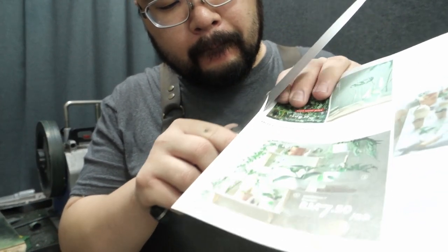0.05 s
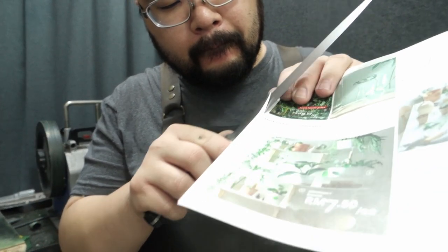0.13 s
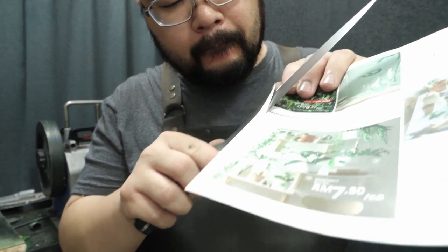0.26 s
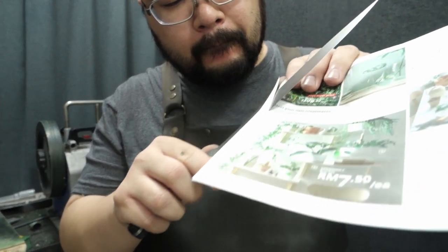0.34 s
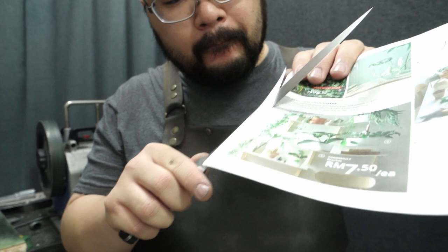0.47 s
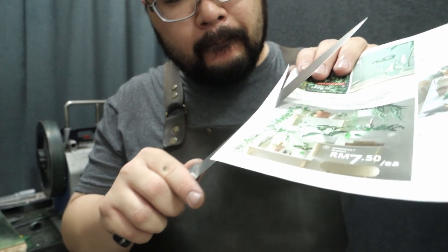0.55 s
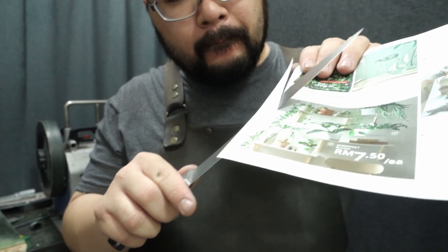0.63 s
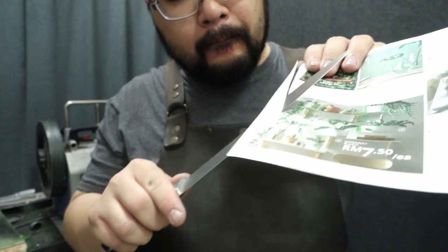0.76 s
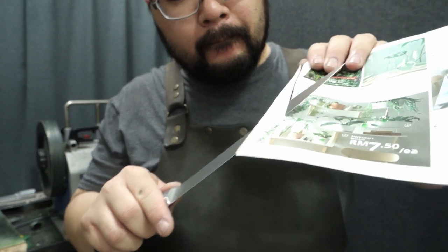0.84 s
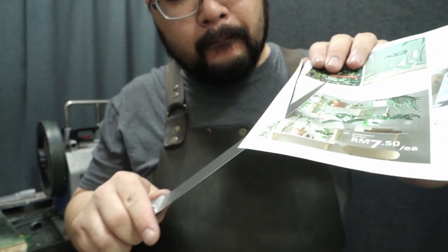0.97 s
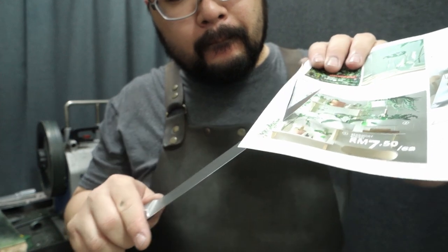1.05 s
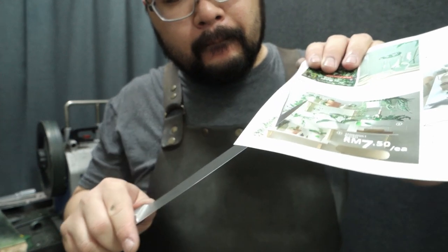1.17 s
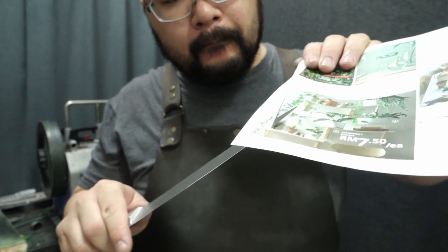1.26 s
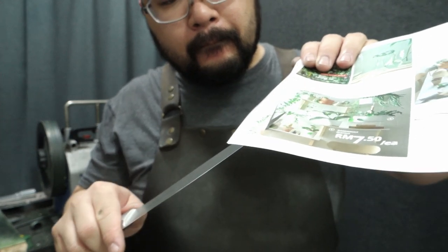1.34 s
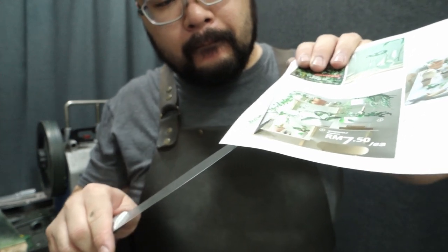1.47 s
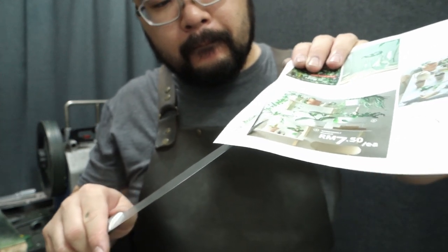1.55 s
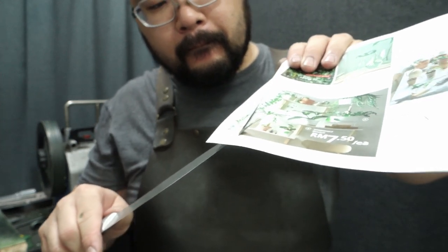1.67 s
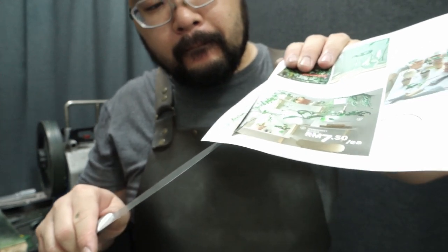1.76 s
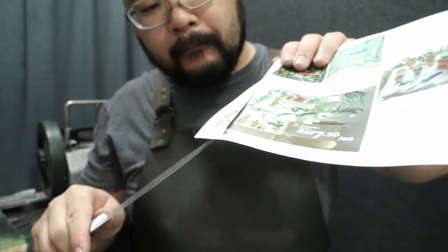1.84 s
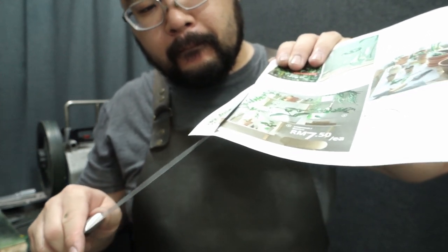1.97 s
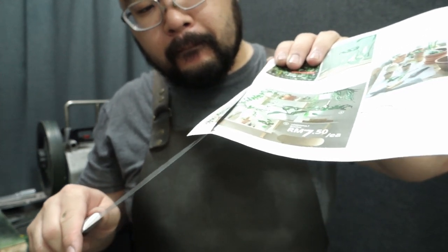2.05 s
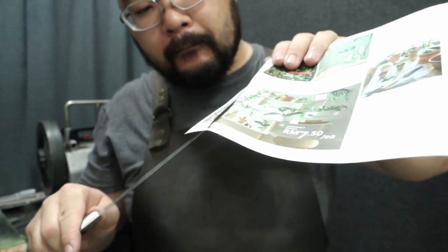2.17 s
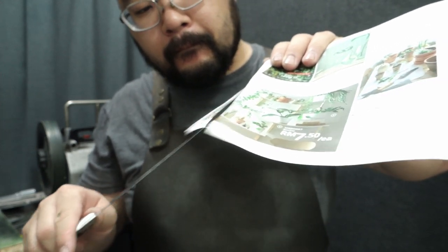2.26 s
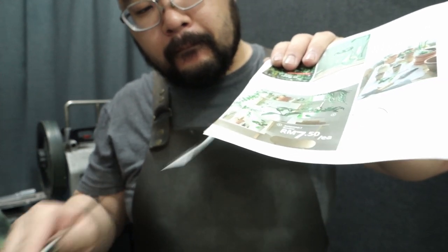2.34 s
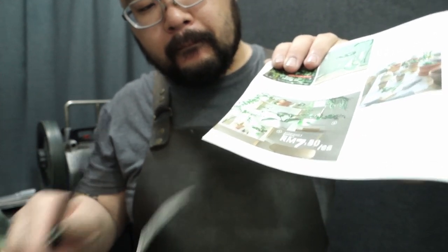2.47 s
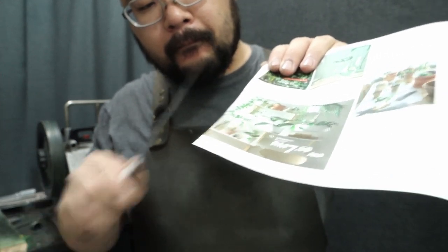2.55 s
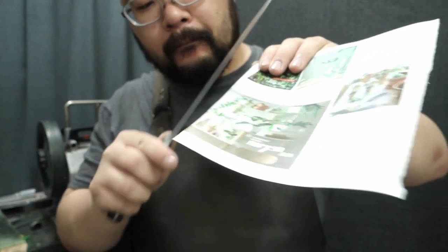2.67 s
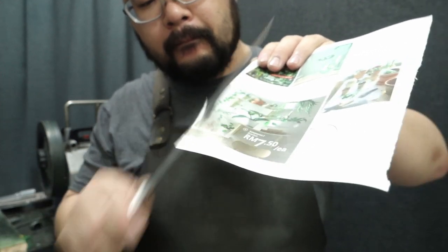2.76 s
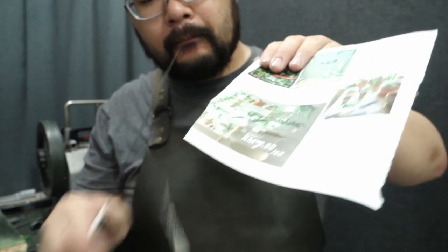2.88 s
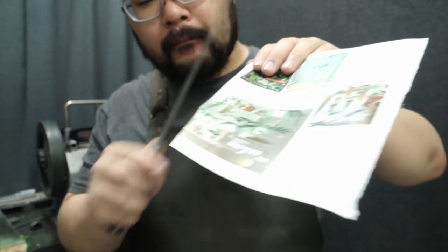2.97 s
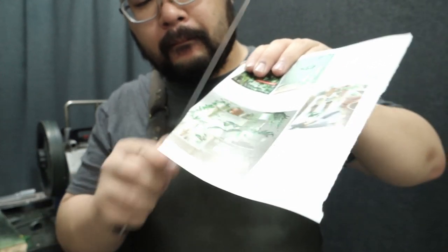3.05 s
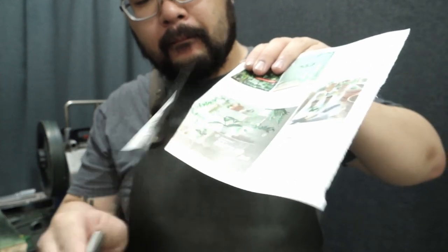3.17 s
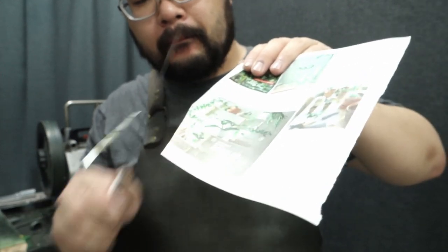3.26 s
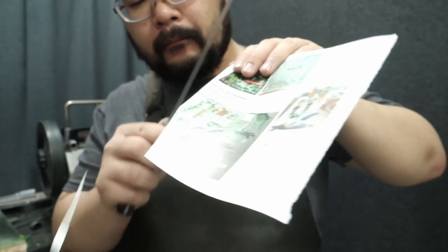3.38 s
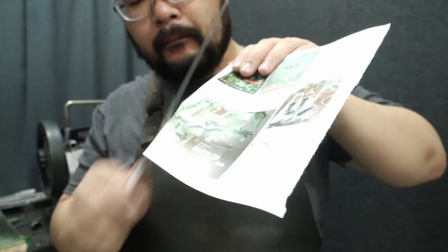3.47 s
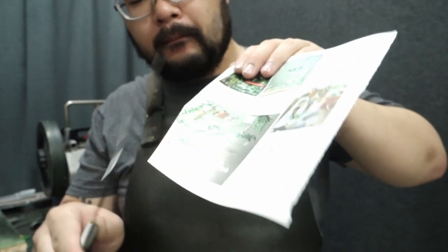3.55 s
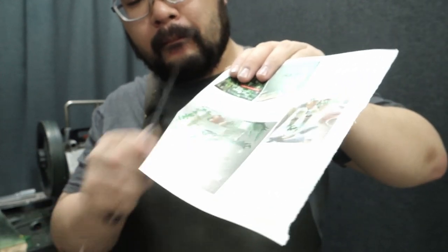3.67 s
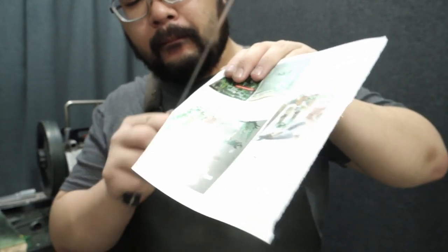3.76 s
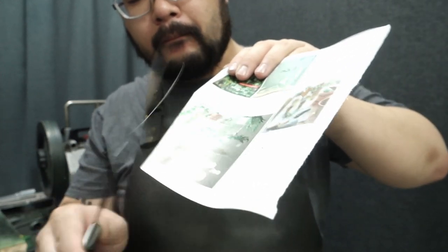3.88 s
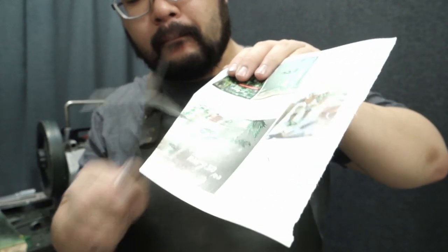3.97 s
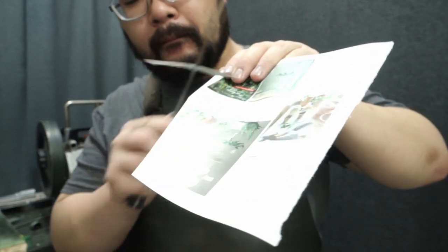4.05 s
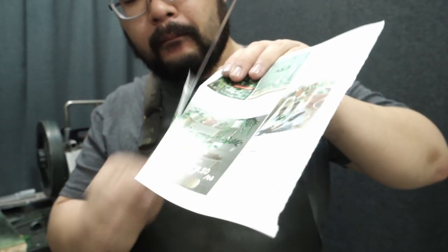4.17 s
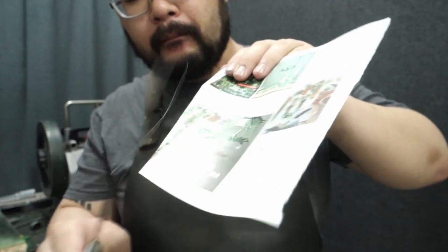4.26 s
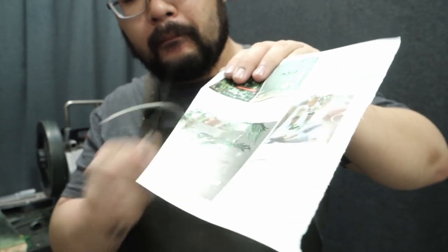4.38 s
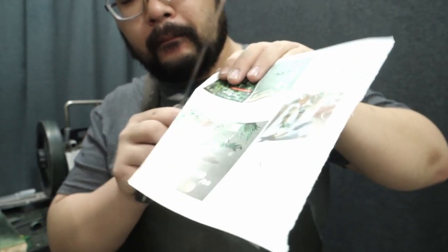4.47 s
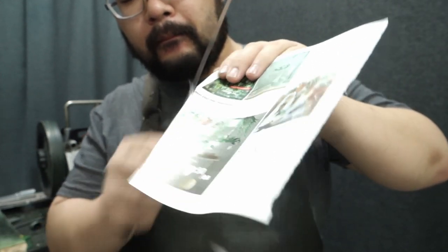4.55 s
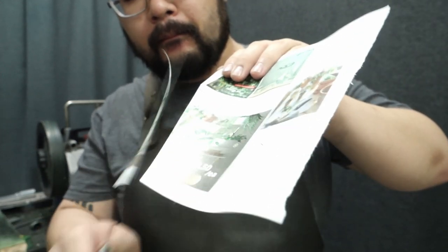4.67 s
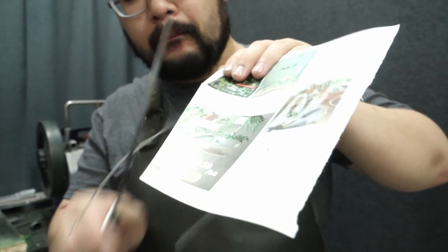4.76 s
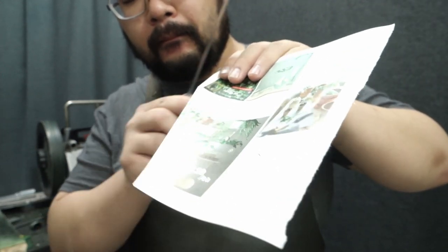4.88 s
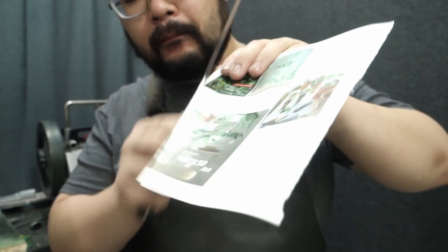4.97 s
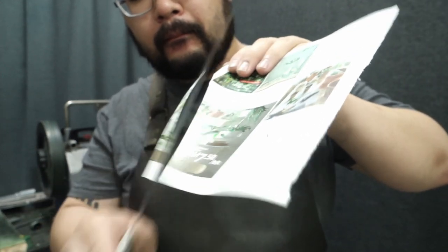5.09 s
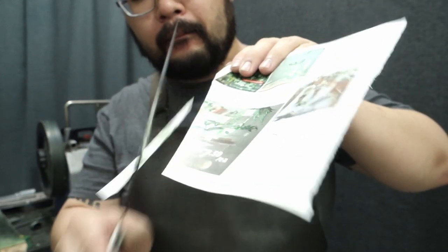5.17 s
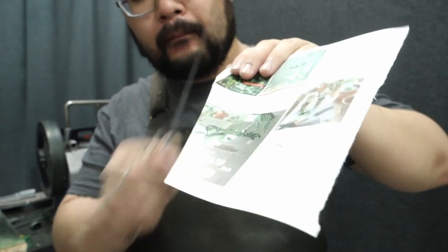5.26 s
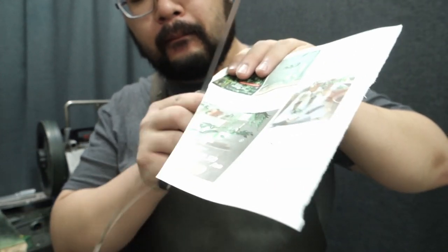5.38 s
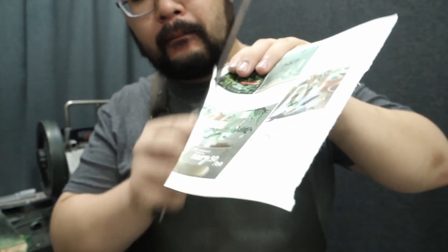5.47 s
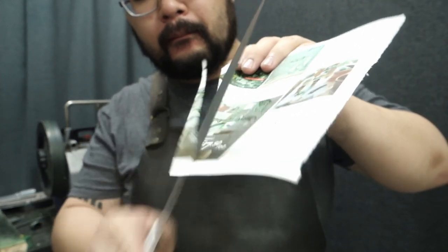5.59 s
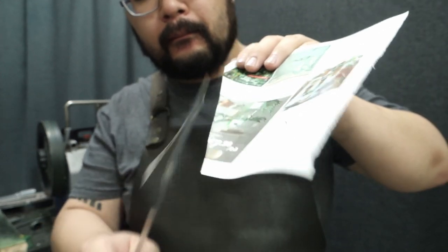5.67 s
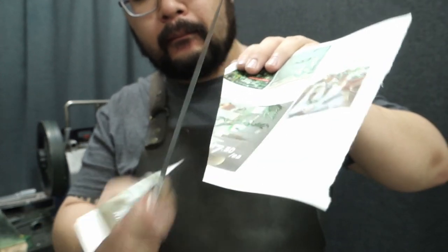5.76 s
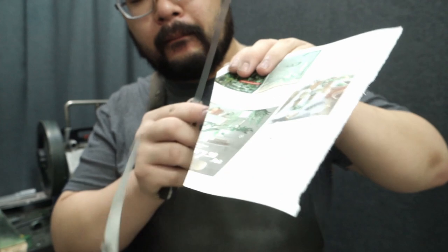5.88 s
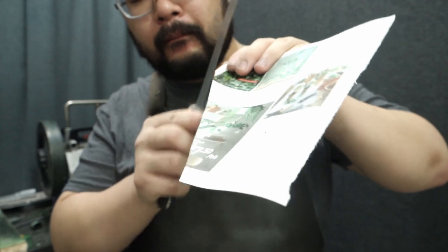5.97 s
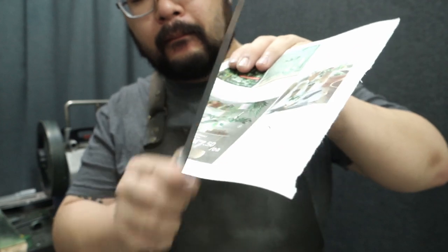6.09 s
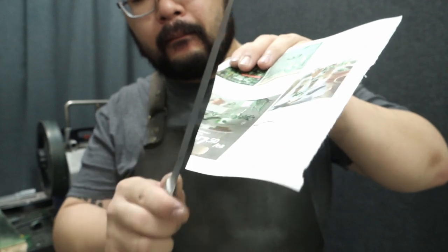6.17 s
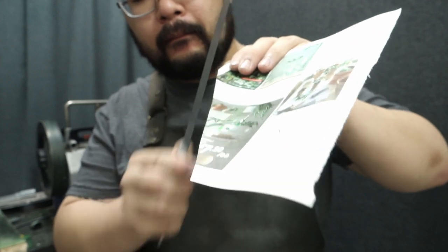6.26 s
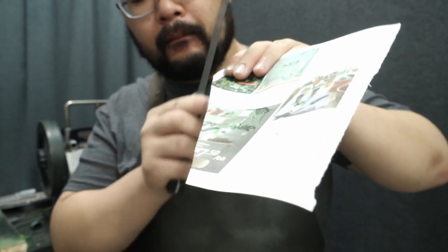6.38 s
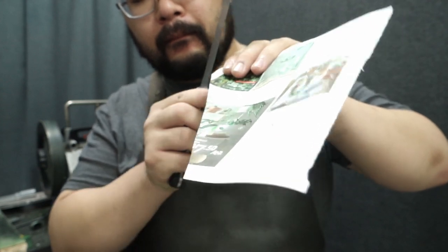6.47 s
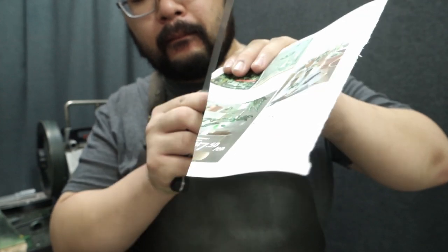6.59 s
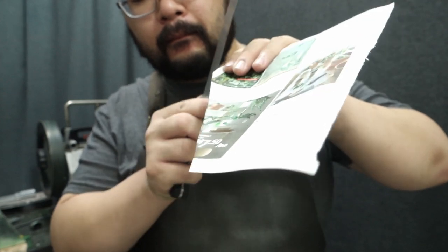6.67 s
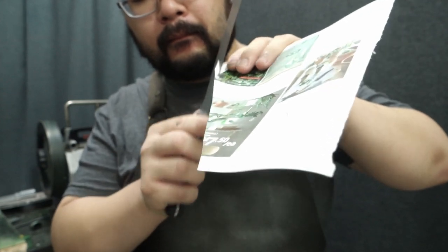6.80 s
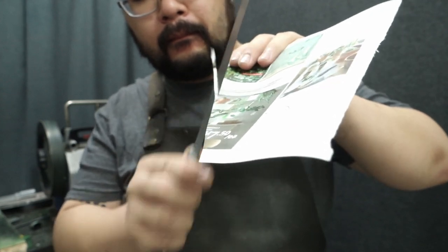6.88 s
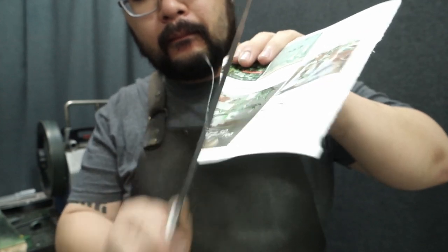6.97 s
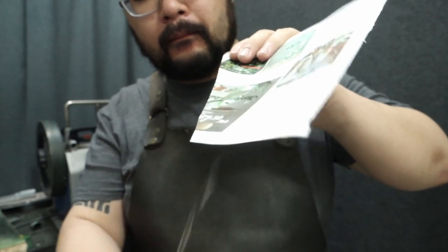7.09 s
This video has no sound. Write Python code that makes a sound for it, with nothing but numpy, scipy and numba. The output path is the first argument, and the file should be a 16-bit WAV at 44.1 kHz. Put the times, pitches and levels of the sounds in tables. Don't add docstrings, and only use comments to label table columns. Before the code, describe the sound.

A kitchen knife works through a sheet of glossy paper, very close in stereo. First a slow, wavering, gritty tear lying to the right fades to a creep, with small crease ticks. Then eight separate quick slices, growing longer and brighter, with light rustles between them, and finally one slow draw that swells and thins into sizzle. A small curtained workshop answers briefly over a low fan drone.

```python
import sys
import numpy as np
from scipy import signal
from scipy.fft import rfft, irfft
from scipy.io import wavfile
from scipy.ndimage import uniform_filter1d, map_coordinates
from numba import njit

SR = 44100
rng = np.random.default_rng(int(sys.argv[2]) if len(sys.argv) > 2 else 0)


def master(y):
    cut = np.clip(np.atleast_2d(y).T, -1, 1)
    pcm = np.round(cut * 32767)
    wavfile.write(sys.argv[1], SR, pcm.astype(np.int16))


def attenuation_scalar(level_db):
    decades = np.asarray(level_db, float) / 20
    return 10 ** decades


N = 314433


@njit
def svf(x, hz, width, low):
    y, b, l = np.empty(len(x)), 0., 0.
    for i in range(len(x)):
        g, k = np.tan(np.pi * hz[i] / SR), width[i] / hz[i]
        v = (b + g * (x[i] - l)) / (1 + g * (g + k))
        y[i] = (1 - low) * k * v + low * (l + g * v)
        b, l = 2 * v - b, l + 2 * g * v
    return y


def band(x, hz, width):
    width = width + np.zeros(len(x))
    once = svf(x, hz, width, 0.)
    return svf(once, hz, width, 0.) / np.sqrt(width / 28000)


def highpass(x, hz):
    return signal.sosfilt(signal.butter(2, hz, "high", fs=SR, output="sos"), x)


def walk(rate):
    hold = int(SR / rate)
    steps = np.repeat(rng.standard_normal(N // hold + 1), hold)
    return 1.97 * uniform_filter1d(uniform_filter1d(steps, hold), hold)[:N]


def bumps(table):
    t = np.arange(N) / SR
    return sum(db * np.exp(-((t - s) / half) ** 2) for s, db, half in table)


def contact(t, start, end):
    graze_db, graze_s, land_s = -20, 0.003, 0.0005
    bite_db, bite_s, leave_s = 2.5, 0.0031, 0.004
    graze = attenuation_scalar(graze_db) * np.clip(1 + (t - start) / graze_s, 0, 1)
    bite = attenuation_scalar(bite_db * np.exp(-np.abs(t - start) / bite_s))
    land = np.clip((t - start) / land_s, 0, 1) * bite
    return np.maximum(graze, land) * np.clip(1 - (t - end) / leave_s, 0, 1)


# start_s, length_s, force_db, sharpness_db, droop_db (loss of body at the far edge)
QUICK_CUTS = [
    (2.75, 0.049, -29.5, 3, 0.5),
    (3.1092, 0.062, -24.5, -1, 4),
    (3.4607, 0.066, -22.5, -4, 0.5),
    (3.814, 0.096, -22, -6.5, 6.5),
    (4.1654, 0.1, -22.5, -4.5, 8.5),
    (4.5551, 0.12, -22.5, -4, 5),
    (4.9938, 0.14, -24.5, 0, 7.5),
    (5.4485, 0.18, -24, 0.5, 10),
]


def quick_cuts():
    gather_db, gather_s, droop_power, kept_share = 2, 0.015, 3.9, 1.27
    taut_db, slack_db_per_s = -39, 102.5
    shake_db, shake_s = 16, 0.0089
    along = np.linspace(0, 1, num=24)
    cuts = []
    for start, length, force_db, sharp_db, droop_db in QUICK_CUTS:
        t = along * length
        lost_db = gather_db * np.exp(-t / gather_s) + droop_db * along ** droop_power
        slack_db = taut_db + slack_db_per_s * length + shake_db * np.exp(-t / shake_s) + lost_db
        cuts.append(np.column_stack([start + t, force_db - lost_db, slack_db, sharp_db + kept_share * lost_db]))
    return cuts


# time_s, force_db, slack_db (a slack sheet flaps), sharpness_db (a sharp pull sizzles)
LONG_DRAW = [
    (0.0, -30.5, -17.5, -20),
    (0.11, -33.5, -9, -10),
    (0.31, -36, -17.5, -9.5),
    (0.55, -29.5, -21, -17),
    (0.71, -32.5, -11, -13.5),
    (0.86, -33.5, -6.5, -15),
    (1.39, -35, -8, -19),
    (1.6, -42.5, -7.5, -14),
    (2.12, -42.5, -10.5, -19),
]
TIP_OUT = [
    (2.266, -50, -15, -12),
    (2.275, -37, -13, -14),
    (2.29, -30, -6, -11),
    (2.303, -39, -14, -13),
]
LAST_DRAW = [
    (6.692, -45, -13, -3.5),
    (6.699, -32.5, -15, -5.5),
    (6.804, -28.5, -16, -8),
    (6.91, -23.5, -25, -2),
    (6.962, -25, -20.5, 0),
    (7.015, -34.5, -11, 9.5),
    (7.032, -45.5, -4, -6),
    (7.09, -40.5, -13, -22),
    (7.13, -54, -1, -32),
]
# time_s, dip_db, half_length_s
PAUSES = [(0.047, 6.5, 0.013), (0.176, 5, 0.081), (0.382, 3, 0.018), (0.782, 4, 0.047), (0.92, 1.5, 0.025),
          (1.027, 0.5, 0.02), (1.259, 8, 0.083), (1.344, 1.5, 0.022), (1.58, 8, 0.025), (1.69, 13, 0.013),
          (1.8, 4, 0.027), (1.9, 9, 0.017), (2.012, 7.5, 0.035), (2.122, 15, 0.037), (6.74, 3, 0.032)]


def strokes():
    cuts = [LONG_DRAW, TIP_OUT, *quick_cuts(), LAST_DRAW]
    t, rows = np.arange(N) / SR, np.vstack(cuts)
    touch = sum(contact(t, cut[0][0], cut[-1][0]) for cut in cuts)
    force_db, slack_db, sharp_db = (np.interp(t, rows[:, 0], column) for column in rows.T[1:])
    dip_db = bumps(PAUSES)
    return touch, force_db - dip_db, slack_db + 0.48 * dip_db, sharp_db + 0.36 * dip_db


# time_s, left_minus_right_db, strip_length (freed share 0-1),
# body_lift_hz (by tension), roll_off (ratio to body centre)
PLACE = [(0, -7, 0.4, -150, 1.63), (0.15, -5.5, 0.18, 4, 1.4), (0.5, -11.5, 0.04, -150, 1.53),
         (0.7, -9, 0.17, -100, 1.7), (0.85, -10.5, 0.8, -100, 2.13), (1.12, -10.5, 0.58, -50, 2.4),
         (1.3, -12, 0.6, 4, 2.4), (2.1, -9, 0.4, -53, 1.65), (2.8, -3, 0.7, 0, 1.9),
         (3.15, -2.5, 0.33, 150, 1.6), (4.2, -0.5, 0.6, 150, 1.67), (5.0, -1.5, 0.55, 50, 1.9),
         (5.5, -2, 0.45, -150, 1.9), (6.8, -2.5, 0.4, -100, 1.8), (6.91, -1.5, 0.4, 300, 1.6),
         (7.02, -3.5, 0.53, -100, 1.9), (7.13, -6, 1, 2, 1.7)]


def blade_place():
    rows, t = np.array(PLACE), np.arange(N) / SR
    return [np.interp(t, rows[:, 0], column) for column in rows.T[1:]]


def band_centres(force_db, slack_db, sharp_db, strip, lift_hz):
    flap_hz = 944 + 1.5 * (slack_db + 17) - 250 * strip
    body_hz = 2174 + lift_hz + 12.5 * (force_db + 27.5) + 8.5 * (sharp_db + 7.5)
    edge_hz = 5865 + 500 * (strip - .5) + 22 * (sharp_db + 4.5)
    sizzle_hz = 9880 + 36 * (force_db + 34.5)
    return flap_hz, body_hz, edge_hz, sizzle_hz


def snaps(grit_db, hold):
    size = np.minimum(rng.exponential(size=N // hold + 1), 5.5)
    size = np.repeat(size, hold)[:N]
    spread = np.clip(grit_db, 0, 4) * np.log(10) / 10
    return np.exp(spread * size / 2) * np.sqrt(1 - spread)


def small_events(table, rise, trim_db, edge_law):
    env = np.zeros((4, N))
    for s, db, slack_db, sharp_db, fade in table:
        i = int(s * SR)
        t = np.arange(min(N - i, SR // 4)) / SR
        tail = (1 - np.exp(-t / (rise * fade))) * attenuation_scalar(trim_db + db - 60 * t / fade)
        edge_db = edge_law[0] + edge_law[1] * sharp_db
        env[:, i:i + len(tail)] += attenuation_scalar(np.array([[slack_db], [0], [edge_db], [sharp_db]])) * tail
    return env


# start_s, level_db, slack_db, sharpness_db
TICKS = [(0.5225, -21, -20, -25), (0.543, -18, -25, -25), (0.5485, -19, -25, -25), (0.573, -20, -25, -25),
         (1.5544, -42, -10, -14), (1.6532, -26, -30, -16), (1.7514, -27, -23, -24), (2.0738, -26, -32, -18),
         (2.2938, -22.5, -37, -20), (3.287, -41, 2.5, -18), (3.3264, -43, -20, -7), (4.3622, -19.5, -8, -9),
         (4.063, -44, -15, -14), (4.341, -36, -10, -14), (4.465, -37, -20, -12), (4.49, -38, -33, -8),
         (5.4432, -18.5, -15.5, -17), (6.481, -41, -8, -1), (6.818, -17, -27, -15), (7.043, -30, -8, -16),
         (7.0643, -17.5, -25, -17)]
# offset_db, slope (db per db of sharpness)
TICK_EDGE = (0.5, 0.7)


def crease_ticks():
    return small_events([(*row, 0.013) for row in TICKS], 0.034, -3.5, TICK_EDGE)


# start_s, level_db, slack_db, sharpness_db, fade_s
RUSTLES = [
    (2.797, -31.5, -8, -3, 0.12),
    (3.0514, -76, 0, -9, 0.074),
    (4.3954, -46.5, -5, -7, 0.079),
    (4.4388, -40.5, -31, -5, 0.07),
    (4.4638, -49.5, -3, -4, 0.21),
    (5.2704, -43.5, -17, 8, 0.14),
    (5.777, -40, -8.5, 5, 0.15),
    (6.1174, -45.5, -2, -7, 0.086),
    (6.195, -44.5, -12.5, -0.5, 0.11),
    (6.486, -41, -2.5, -11, 0.16),
]
# offset_db, slope (db per db of sharpness)
RUSTLE_EDGE = (-9.5, -0.22)


def rustles():
    return small_events(RUSTLES, 0.071, 0.0, RUSTLE_EDGE)


# time_s, lift_db, half_length_s
FLARES = [
    (0.33, 3, 0.14),
    (2.778, 2.5, 0.0075),
    (3.124, -4, 0.0051),
    (3.165, 0, 0.0061),
    (4.59, 5, 0.011),
    (4.672, 4, 0.012),
    (5.115, 6.5, 0.022),
    (5.586, 6, 0.012),
    (6.99, 5.5, 0.037),
]
SPREAD = [0.077, 0.011, 0.11, 0.42]
PAN_SHARE = [0.067, 0.37, 0.44, 1.8]
# width_hz, level_db
SING = [(300, -45), (500, -25), (450, -15), (600, -35)]
WIDTHS = [2240, 3550, 12100]


def sheet():
    touch, force_db, slack_db, sharp_db = strokes()
    pan_db, strip, lift_hz, roll_off = blade_place()
    centres = band_centres(force_db, slack_db, sharp_db, strip, lift_hz)
    widths = [centres[0], *WIDTHS]
    band_db = [slack_db, 0, -2.1 + 0.49 * sharp_db, sharp_db + bumps(FLARES)]
    roll_off = np.clip(roll_off + 0.04 * (slack_db + 26), 1.1, 3)
    grit_db = 0.5 + 0.056 * (-13.5 - force_db)
    grain = snaps(grit_db, hold=12)
    knock = crease_ticks() + rustles()
    out = np.zeros((2, N))
    for k in range(4):
        hz = centres[k] * (1 + 0.025 * walk(13))
        cut = touch * attenuation_scalar(force_db + band_db[k] + 0.66 * grit_db * walk(40))
        drive = np.hypot(cut, knock[k]) * grain * rng.standard_normal((3, N))
        core_hz, core_db = SING[k]
        parts = [band(d, hz, widths[k]) + attenuation_scalar(core_db) * band(d, hz, core_hz) for d in drive]
        if k == 1:
            top = hz * roll_off
            for damping in (.5, 1.47, 1.723):
                parts = [svf(p, top, damping * top, 1.) for p in parts]
        if k == 2:
            parts = highpass(parts, 3700)
        if k == 3:
            parts = highpass(parts, 5200)
        both = np.sqrt(1 - SPREAD[k]) * parts[0] + np.sqrt(SPREAD[k]) * np.array(parts[1:])
        out += both * attenuation_scalar(PAN_SHARE[k] * np.array([pan_db, -pan_db]) / 2)
    bass_hz = 527 / 2 ** (1.42 * strip)
    for damping in (0.8, 1.8):
        out = np.array([c - 2 * svf(c, bass_hz, damping * bass_hz, .5) for c in out])
    return out


def mirror(x, lag=0.000738, sway=0.126, share=0.36):
    late = np.arange(N) - lag * SR * (1 + sway * walk(2.5))
    echo = np.array([map_coordinates(c, [late], order=3) for c in x])
    return x + share * highpass(echo, 3500)


BOUNCE = [(0, 4.54, 0.51), (0.13, 5.02, 0.2)]


def housing(x):
    w = 2 * np.pi * np.fft.rfftfreq(N)
    gain = [(np.exp(-1j * w * lag) + share * np.exp(-1j * w * echo)) / (1 + share) for lag, echo, share in BOUNCE]
    return irfft(rfft(x) * gain, N)


# pitch_hz, decay_s (to -60 dB)
ROOM_T60 = [(300, 0.97), (800, 0.25), (2100, 0.24), (5500, 0.27), (11000, 0.25)]


def room(x, first=0.0062, level_db=-9.5):
    t, tail = np.arange(SR // 2) / SR, 0
    pitch_hz, decay_s = np.transpose(ROOM_T60)
    for hz in 250 * 2 ** np.arange(0, 5.6, .5):
        t60 = np.interp(np.log(hz), np.log(pitch_hz), decay_s)
        mid, side = (svf(rng.standard_normal(len(t)), hz + 0 * t, hz / 2.43 + 0 * t, 0.) for _ in range(2))
        fade = attenuation_scalar(-60 * t / t60) * (t > first) / np.sqrt(t60)
        tail = tail + fade * (mid + min(hz / 5400.0, .8) * side * np.array([[1], [-1]]))
    tail = tail / np.sqrt(np.sum(tail ** 2) / 2)
    return attenuation_scalar(level_db) * signal.fftconvolve(x.mean(axis=0)[None], tail, axes=1)[:, :N]


# pitch_hz, level_db (per Hz)
FAN = [(24, -101.5), (40, -60), (172, -25.5), (194, -24.5), (349, -18.5), (508, -19.5), (643, -3.5),
       (795, -20), (1110, -9), (1540, -20), (1770, -13.5), (2900, -29.5), (11100, -32), (14400, -71),
       (22000, -120)]
# pitch_hz, width_hz, lift_db
DUCT = [(197.7, 17.4, 9.5), (693, 44, 7), (1064, 320, 0), (1756, 72, 6), (2214, 73, 11), (2596, 120, 10)]


def fan():
    level_db, hiss_pan_db, alike_hz = -56, -3.5, 1800
    f = np.maximum(np.fft.rfftfreq(N, 1 / SR), 1)
    pitch_hz, fan_db = np.transpose(FAN)
    db = np.interp(np.log(f), np.log(pitch_hz), fan_db)
    db = db + sum(lift_db / (1 + (2 * (f - hz) / width) ** 2) for hz, width, lift_db in DUCT)
    apart = np.clip(0.055 + 1 / (1 + (alike_hz / f) ** 3), 0, 1)
    same, left, right = rfft(rng.standard_normal((3, N)))
    both = np.sqrt(1 - apart) * same + np.sqrt(2 * apart) * np.array([left, right])
    both = both * attenuation_scalar(db + hiss_pan_db * apart * np.array([[.5], [-.5]]))
    out = irfft(both, N)
    return attenuation_scalar(level_db + 1.1 * walk(6.69)) * out / np.std(out.mean(axis=0))


# start_s, level_db
THUMPS = [(2.751, -73), (3.108, -65), (3.463, -83), (3.816, -65), (4.165, -69), (4.362, -82), (4.555, -72),
          (4.994, -65), (5.264, -75.5), (5.442, -71), (6.942, -84)]


def thumps(hz=70, t60=0.15):
    env, t = np.zeros(N + SR), np.arange(SR // 5) / SR
    for s, db in THUMPS:
        i = int(s * SR)
        env[i:i + len(t)] += attenuation_scalar(db - 60 * t / t60)
    noise = rng.standard_normal((3, N))
    same, left, right = (band(x, hz + np.zeros(N), 3.1 * hz) for x in noise)
    return env[:N] * (same + 0.24 * np.array([left, right]))


# start_s, pitch_hz, level_db, length_s, glide_hz
RINGS = [
    (3.179, 6800, -36.5, 0.029, 0),
    (2.965, 7750, -72, 0.11, 550),
    (5.85, 8450, -66, 0.11, -1000),
]


def rings():
    out = np.zeros(N)
    for s, hz, db, length, glide_hz in RINGS:
        i, t = int(s * SR), np.arange(int(length * SR)) / SR
        turns = np.cumsum(hz + glide_hz * np.sin(np.pi / 2 * t / length) ** 2) / SR
        fade = attenuation_scalar(db - 60 * t) * signal.windows.tukey(len(t), .2)
        out[i:i + len(t)] += fade * np.sin(2 * np.pi * turns)
    return out


def scene():
    near = sheet() + rings()
    return housing(mirror(near)) + room(near) + thumps() + fan()


def low_pass(x):
    return signal.sosfilt(signal.butter(12, 12360, fs=SR, output="sos"), x)


def record(dry):
    cut = signal.sosfilt(signal.ellip(12, .3, 48, 11020, fs=SR, output="sos"), dry)
    return low_pass(cut)


dry = scene()
out = record(dry)
master(out)
```